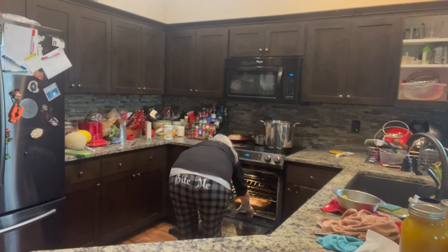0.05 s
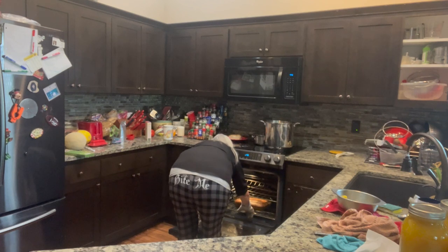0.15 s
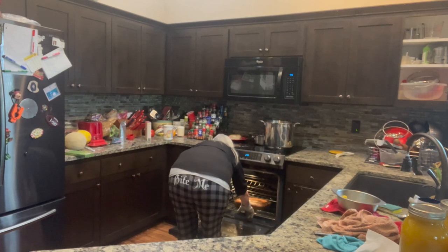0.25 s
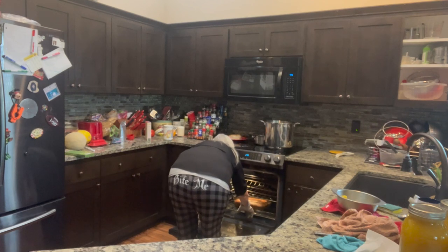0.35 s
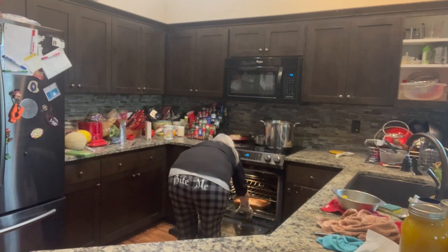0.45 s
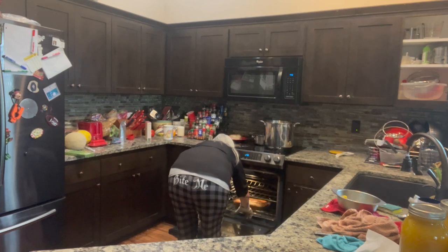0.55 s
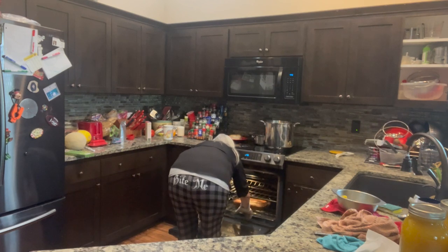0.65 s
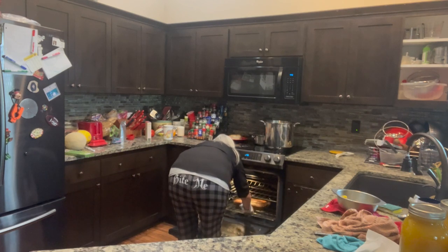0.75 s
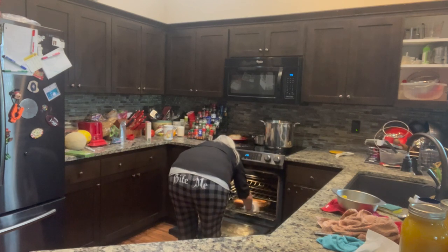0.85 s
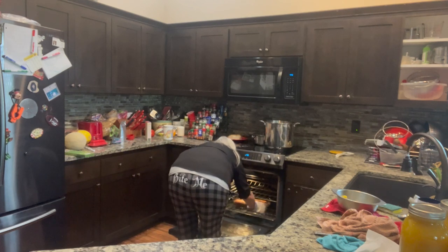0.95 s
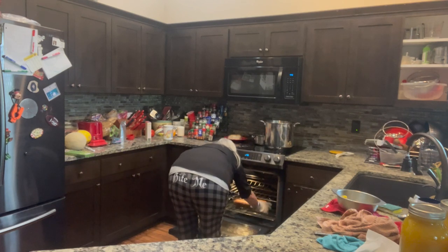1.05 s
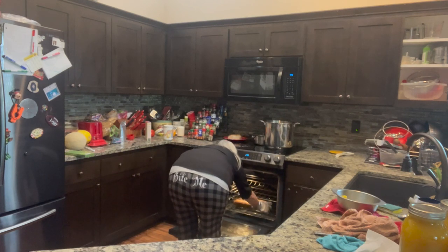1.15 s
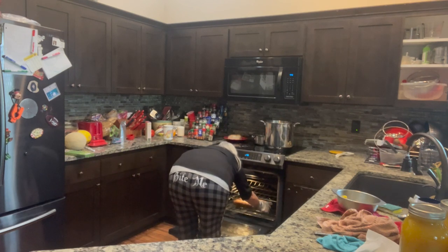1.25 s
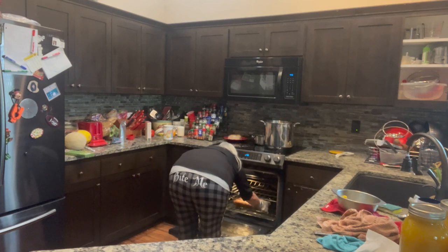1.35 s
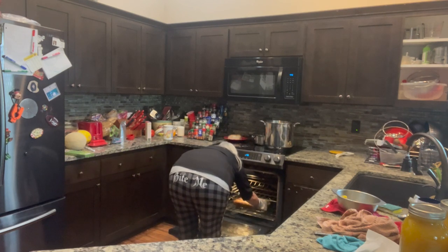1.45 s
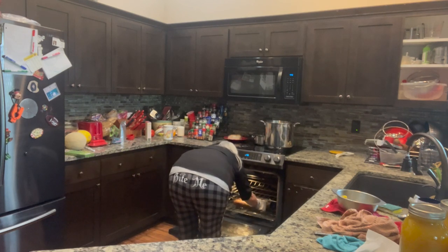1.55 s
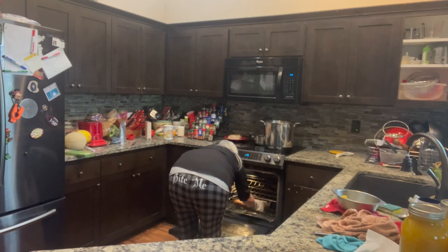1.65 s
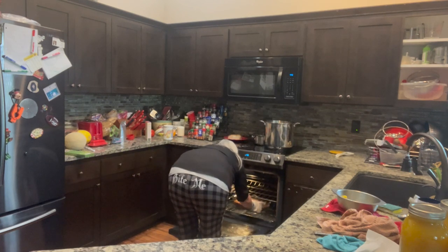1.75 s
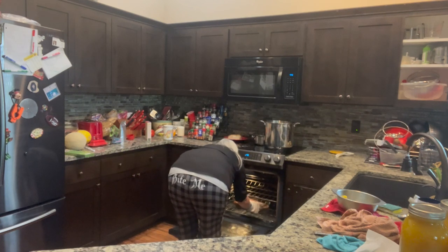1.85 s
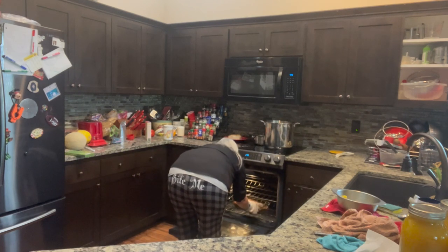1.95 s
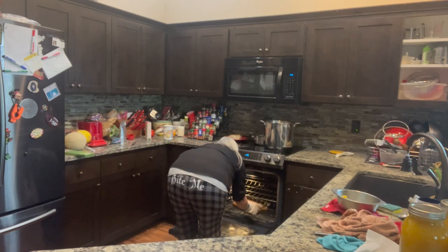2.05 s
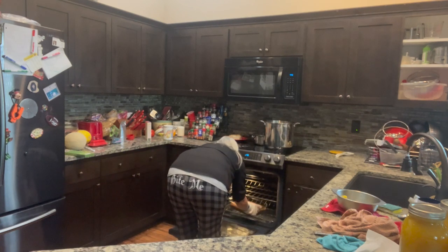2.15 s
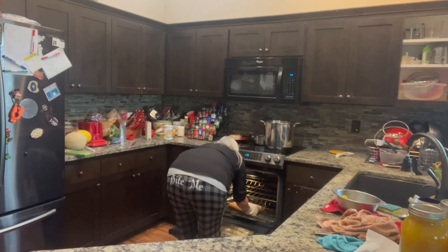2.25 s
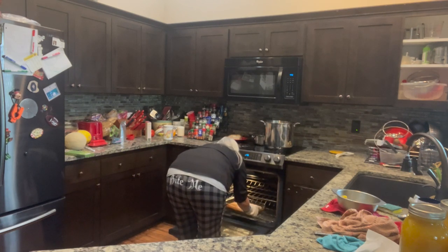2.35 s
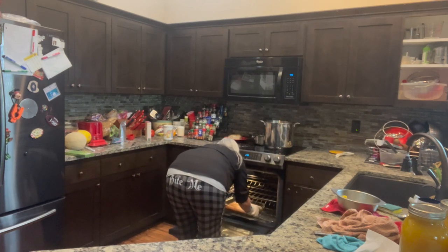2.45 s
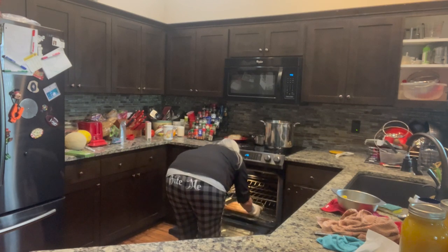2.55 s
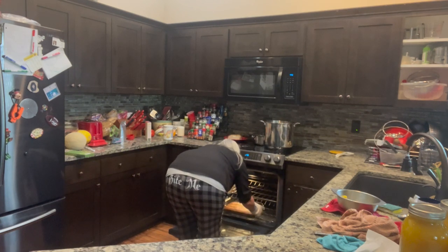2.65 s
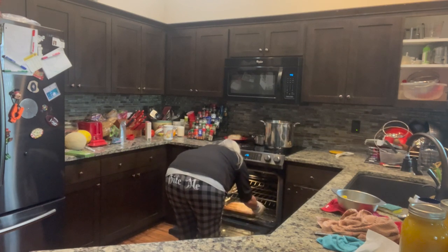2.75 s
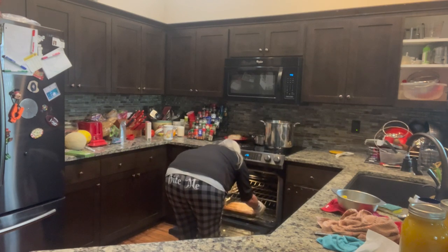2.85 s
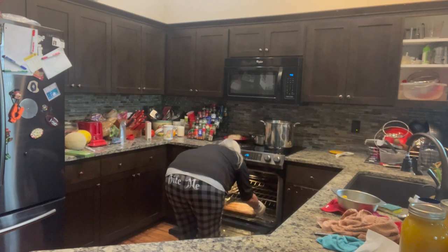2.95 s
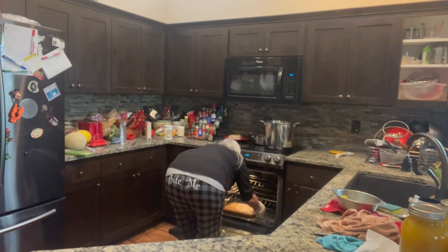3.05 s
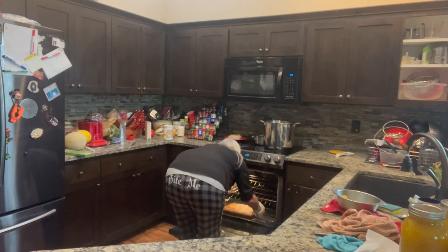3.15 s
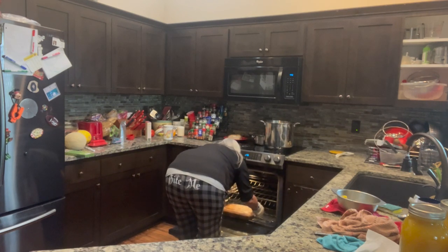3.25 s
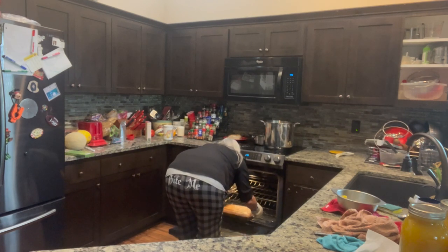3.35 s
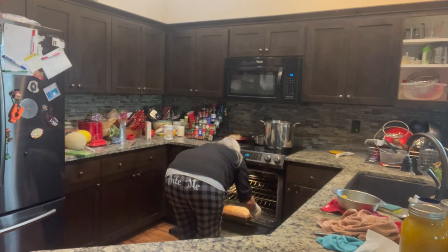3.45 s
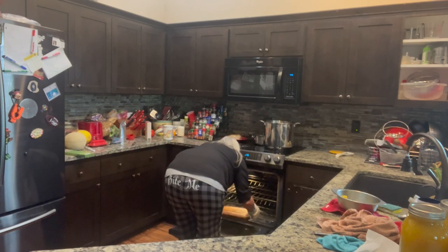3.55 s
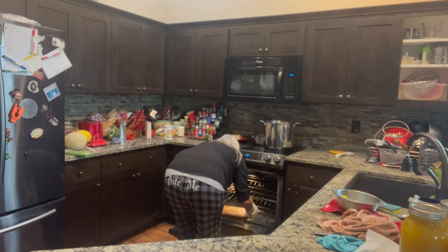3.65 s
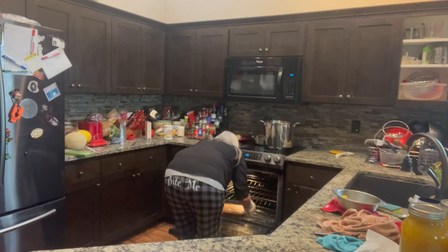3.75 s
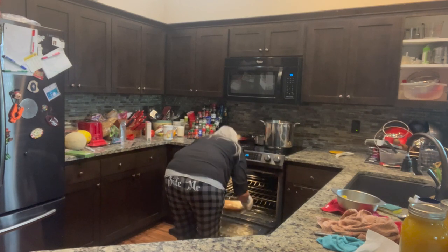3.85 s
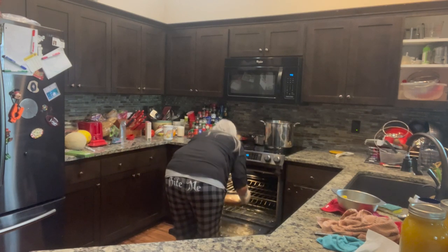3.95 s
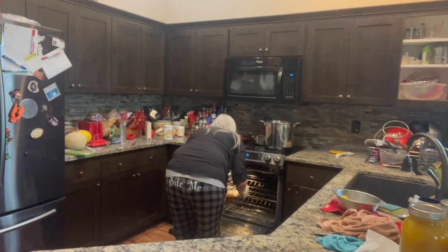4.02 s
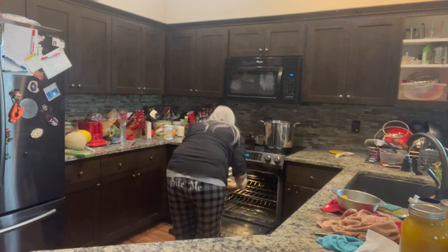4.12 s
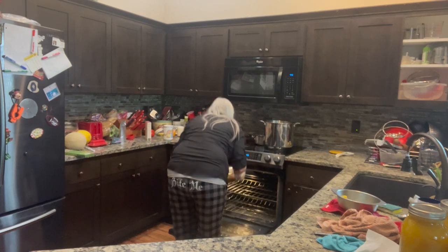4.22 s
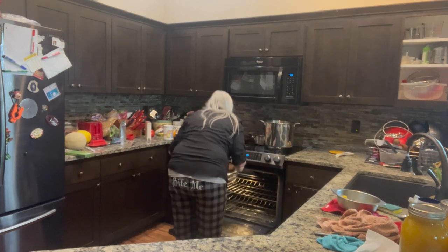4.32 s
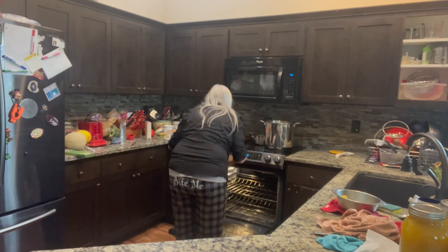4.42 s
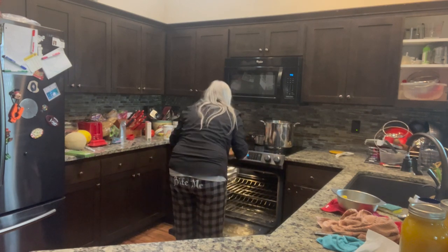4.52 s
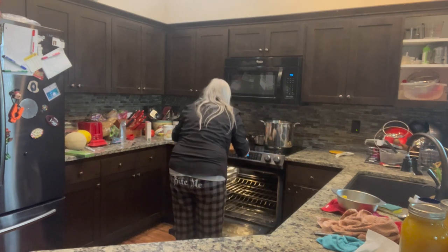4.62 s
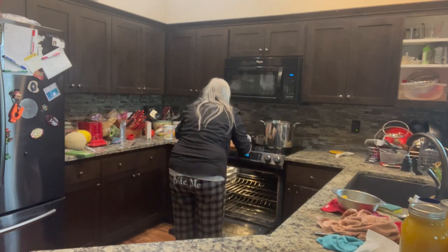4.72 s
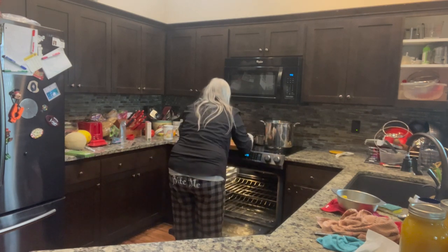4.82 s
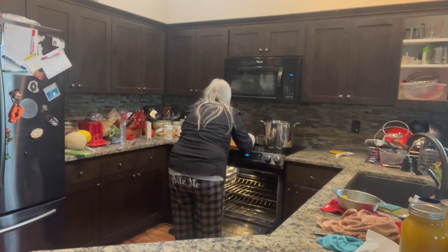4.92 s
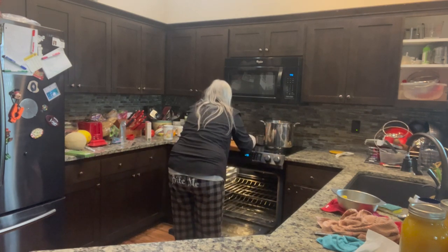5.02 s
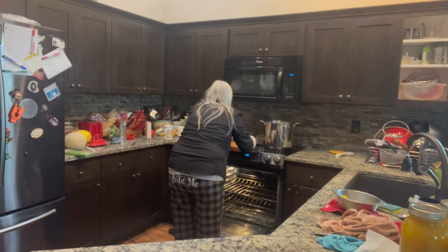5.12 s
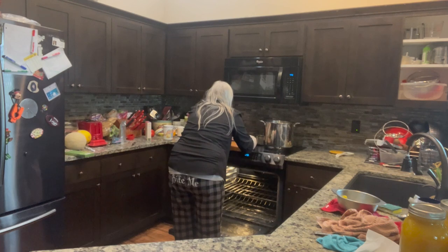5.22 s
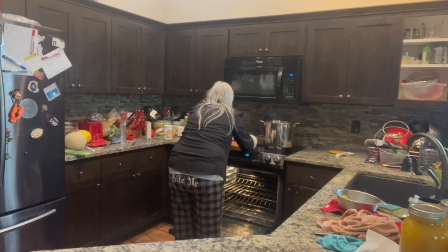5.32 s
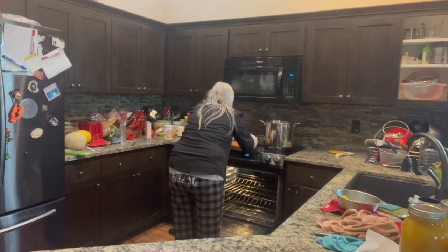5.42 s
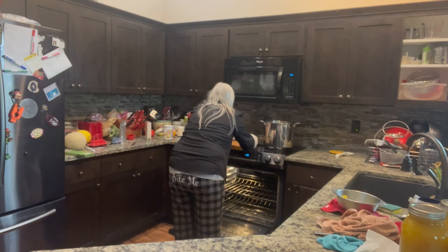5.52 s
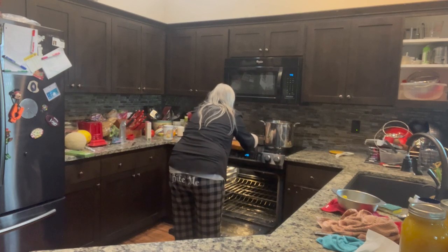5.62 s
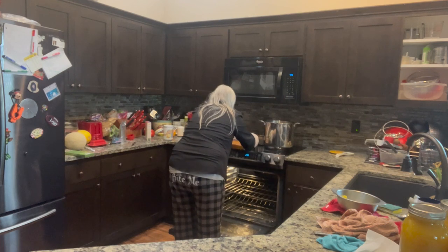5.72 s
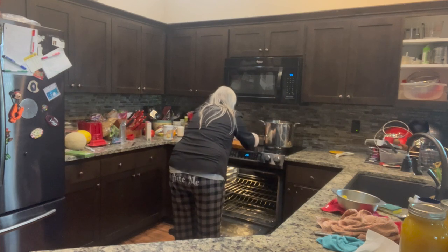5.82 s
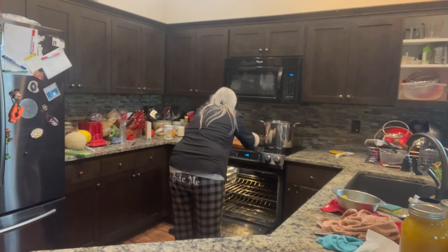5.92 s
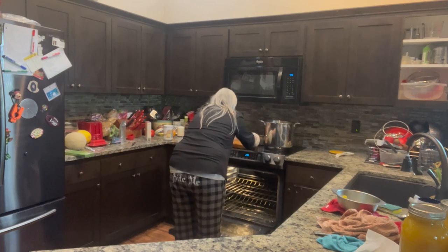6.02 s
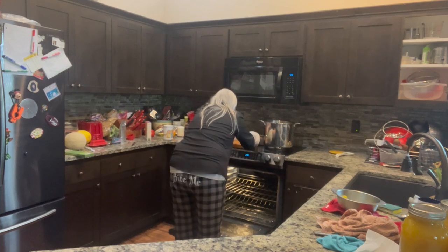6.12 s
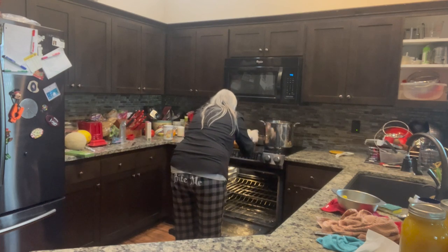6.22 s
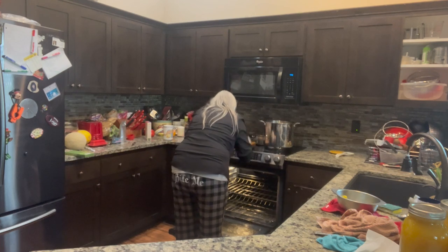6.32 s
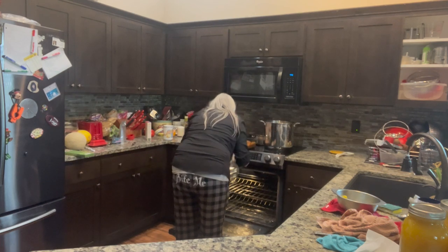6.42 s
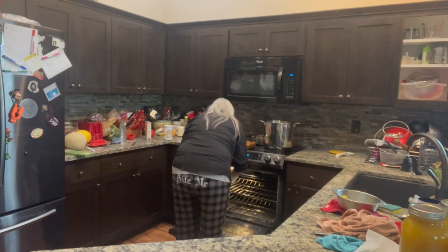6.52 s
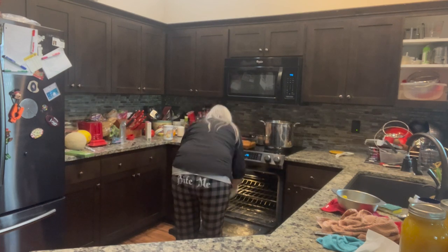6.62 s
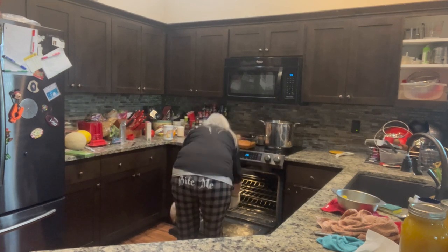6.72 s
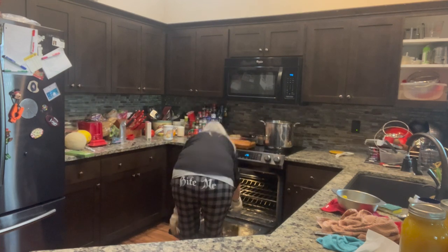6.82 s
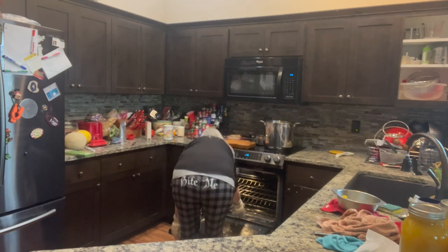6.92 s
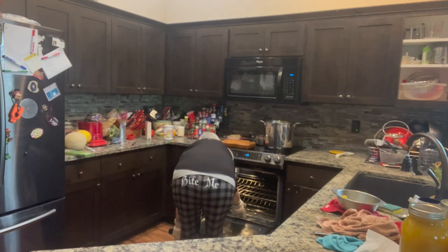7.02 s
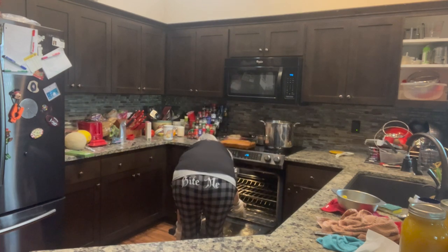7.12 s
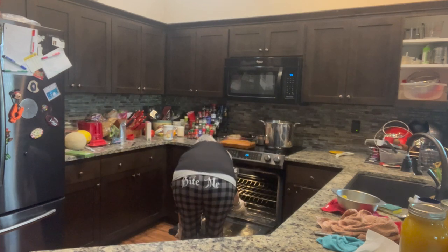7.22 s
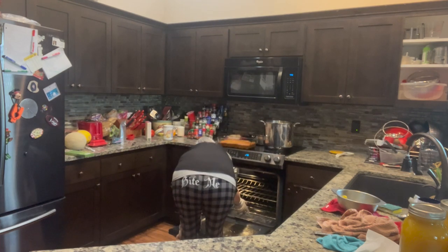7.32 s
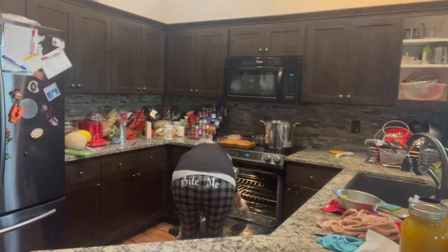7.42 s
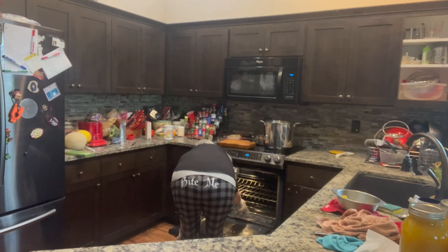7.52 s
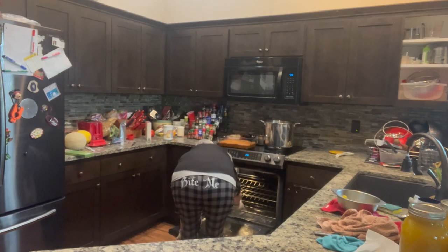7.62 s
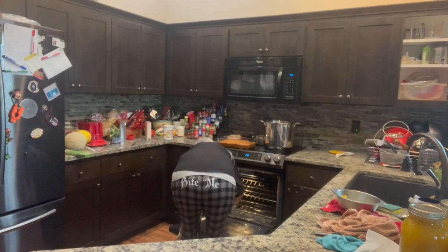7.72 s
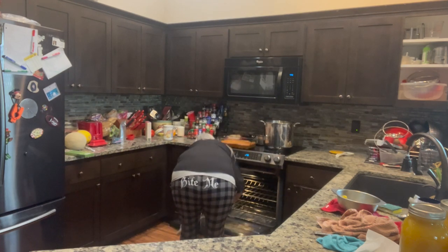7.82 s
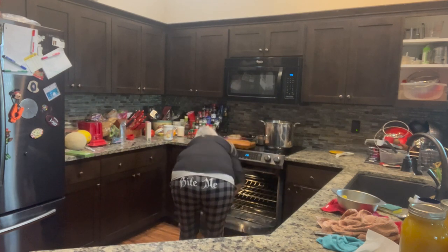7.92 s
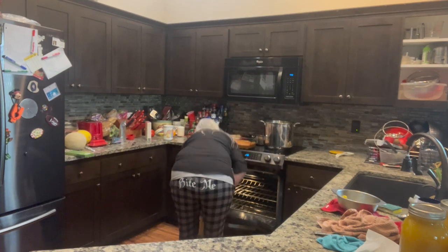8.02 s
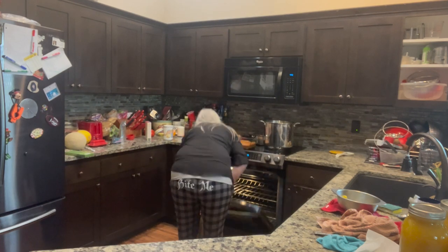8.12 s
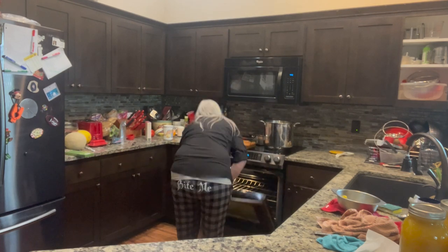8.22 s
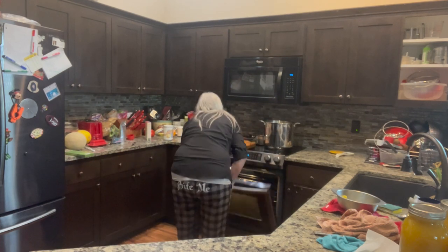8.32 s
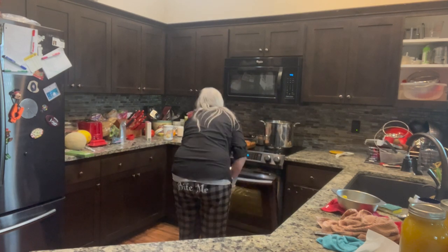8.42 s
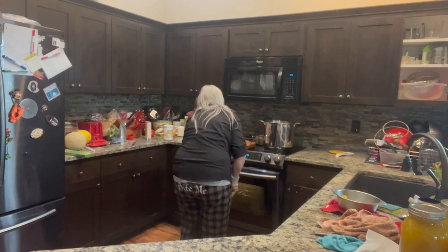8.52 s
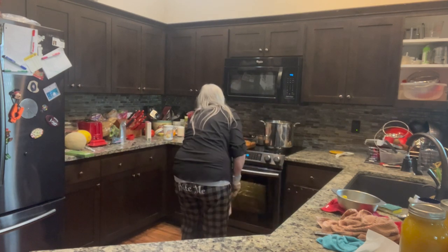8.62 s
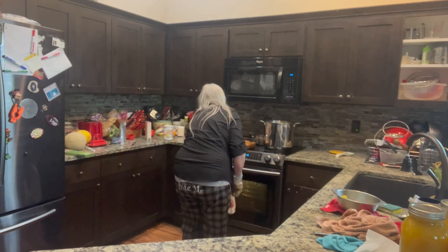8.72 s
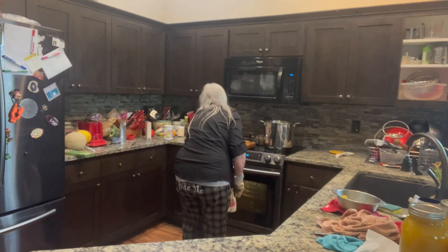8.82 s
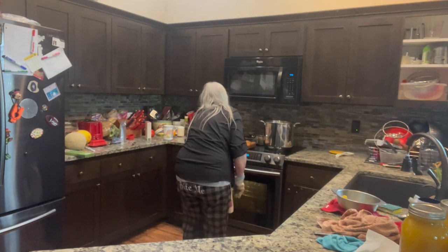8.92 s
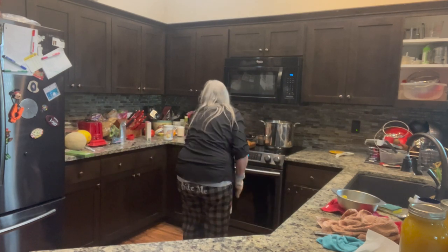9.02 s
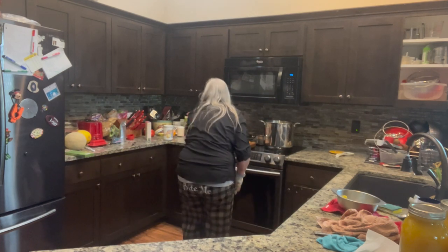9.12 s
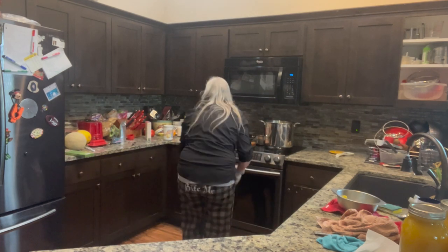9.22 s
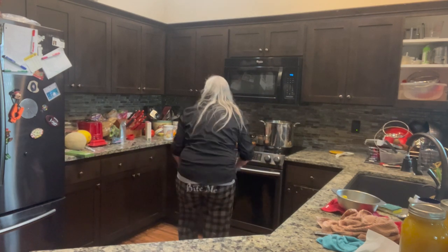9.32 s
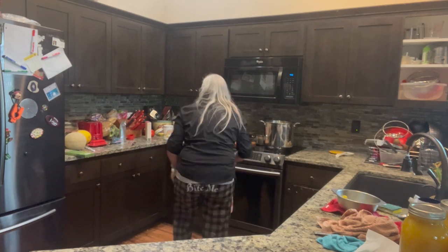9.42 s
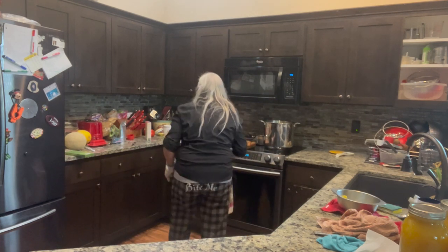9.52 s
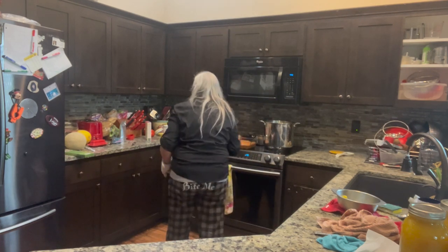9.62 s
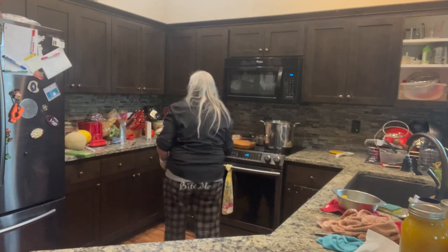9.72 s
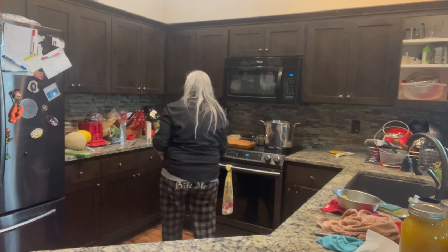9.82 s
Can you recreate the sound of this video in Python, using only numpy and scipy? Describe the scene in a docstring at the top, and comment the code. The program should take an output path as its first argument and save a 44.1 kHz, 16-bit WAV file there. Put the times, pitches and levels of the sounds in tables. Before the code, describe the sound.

Stereo pickup from across a reverberant kitchen: metal rattles as an oven rack is bumped, a baking pan gives one soft knock, and the rack squeaks along its rails. After a quiet pause the pan thumps down on the stove and shifts with small scrapes. Then the rack scrapes and slams in, ringing, the oven door creaks up with knocks, thumps shut and settles, over faint appliance rumble and hiss.

```python
"""A home kitchen in stereo: appliances rumble and a thin hiss runs throughout.
A wire oven rack is knocked and slid out, squeaking and humming; a baking pan is struck once; a faint treble
tick joins from 2.6 s; the pan lands on the stovetop and is nudged; the rack is shoved back with a clang; the
oven door is raised, shut and settles. Blows are noise bursts, ringing modes and a thud; scrapes and rustles
are grainy noise; squeaks and hums are unsteady sines. Hard walls answer with decaying noise."""
import sys
import numpy as np
from scipy import signal
from scipy.fft import rfft, irfft, next_fast_len
from scipy.io import wavfile
from scipy.ndimage import uniform_filter1d, map_coordinates

SR = 44100
rng = np.random.default_rng(int(sys.argv[2]) if len(sys.argv) > 2 else 0)


def wav_record(signal):
    """Record a signal, one row per channel, as 16-bit PCM in the file named by sys.argv[1]."""
    frames = np.transpose(np.atleast_2d(signal))
    bounded = np.clip(frames, -1, 1)
    # unit amplitude maps onto the largest positive 16-bit level
    quanta = np.round(bounded * 32767).astype(np.int16)
    wavfile.write(sys.argv[1], SR, quanta)


N = 434826
TIME = np.arange(N) / SR

# room tone before the stereo stage: (t/s, rumble level/dB, hiss level/dB)
TONE_LEVEL = [(0, -60, -90), (2.5, -63.5, -85), (4.3, -62.5, -83.5), (6.3, -63, -84.5), (6.5, -63, -78),
              (6.85, -62.5, -76.5), (7, -60.5, -80), (8.3, -57.5, -81), (9.86, -60, -81.5)]
# ringing modes of the stovetop: (f/Hz, relative level/dB, t60/s)
STOVE_MODES = [(366, 3, 0.079), (565, -3, 0.12), (1490, -26, .1), (2900, -12.5, 0.077), (3150, -13, 0.07)]
# ringing modes of the oven door: (f/Hz, relative level/dB, t60/s)
DOOR_MODES = [(121, 6, 0.12), (161.5, 4.5, 0.14), (347, 1, 0.13), (518, -17, 0.17), (810, -22, 0.62),
              (1556, -10, 0.16), (2270, -15, 0.24), (3260, -5, 0.076)]
# shares of a sound in the two fields (first, second): all in the first
CENTRE = np.array([[1], [0]])


def amp(db):
    """Decibels to amplitude."""
    return 10 ** (np.asarray(db) / 20)


def unit(x):
    """Scale to an rms of one."""
    return x / np.sqrt(np.mean(x ** 2) + 1e-20)


def along(points, hz):
    """Read a curve of (f/Hz, value) points on a log frequency axis."""
    f, v = np.transpose(points)
    return np.interp(np.log(hz + 1), np.log(f + 1), v)


def fade(n, rise=.022, fall=0.022):
    """Straight ends for a stretch of n samples; rise and fall in s."""
    k = np.arange(n) / SR
    return np.clip(np.minimum(k / rise, (n / SR - k) / fall), 0, 1)


def stretch(s, length):
    """The sample range of an event and the seconds since its start."""
    span = slice(round(s * SR), round((s + length) * SR))
    return span, TIME[span] - s


def wobble(rate):
    """A smooth random curve, rate knots a second."""
    coarse = TIME[::16]
    knots = rng.standard_normal(int(N * rate / SR) + 4)
    return np.interp(TIME, coarse, map_coordinates(knots, [coarse * rate]))


def filtered(x, response):
    """x shaped by a response of frequency."""
    m = next_fast_len(N + SR // 2)
    return irfft(rfft(x, m) * response(np.fft.rfftfreq(m, 1 / SR)), m)[..., :N]


def banded(envelopes, centres_hz):
    """Dense coloured noise under one envelope for each register, low to high."""
    # overall colour of the noise: (f/Hz, relative level/dB per Hz)
    noise_colour = [(30, -27.5), (60, 3.5), (130, 2.5), (300, -6), (600, -4), (1200, -6.5), (1750, -9.5),
                    (2100, -11.5), (2700, -12), (3300, -12), (5000, -15), (8000, -16.5), (11000, -19.5),
                    (13000, -32), (14200, -29.5), (15700, -37)]
    m = next_fast_len(N + SR // 2)
    hz = np.fft.rfftfreq(m, 1 / SR)
    colour = amp(along(noise_colour, hz))
    spectrum = 0
    for envelope, band in zip(envelopes, np.eye(len(centres_hz))):
        # neighbouring registers cross over evenly in power
        shape = np.sqrt(along(list(zip(centres_hz, band)), hz)) * colour
        noise = envelope * rng.standard_normal((2, N))
        spectrum = spectrum + rfft(noise, m) * unit(shape)
    return irfft(spectrum, m)[:, :N]


def patchy(x, patchy_db):
    """Brief patches of pitch rise and fall in level."""
    z = signal.stft(x, nperseg=1024)[2]
    field = uniform_filter1d(rng.standard_normal(z.shape[1:]), size=3, axis=0)
    field = uniform_filter1d(field, size=5, axis=1)
    gain = amp(patchy_db * unit(field))
    return signal.istft(z * unit(gain), nperseg=1024)[1][:, :N]


def kitchen(x):
    """The walls answer with noise in which each frequency dies at its own speed."""
    # decay of the place: (f/Hz, t60/s)
    wall_t60 = [(60, 0.76), (250, 0.55), (1000, 0.52), (4000, 0.57), (10000, 0.44)]
    hz, t, z = signal.stft(rng.standard_normal((2, SR)), SR, nperseg=256)
    t60 = along(wall_t60, hz)[:, None]
    tail = signal.istft(z * amp(-60 * t / t60), SR, nperseg=256)[1]
    delayed = np.pad(x, ((0, 0), (100, 0)))  # the answer starts 100 samples late
    return signal.fftconvolve(delayed, tail / np.linalg.norm(tail[0]), axes=1)[:, :N]


def scattered(x, count=4, slice_s=.006):
    """Echoes without steady pitch: successive short slices take turns among several decaying noise tails."""
    turn = TIME / slice_s
    out = 0
    for k in range(count):
        share = np.clip(1 - np.abs((turn - k) % count - 1), 0, 1)
        out = out + kitchen(x * np.sqrt(share))
    return out


def stereo(pair):
    """Two fields become mid and side by left-right correlation; the top treble is in opposite phase."""
    # correlation: (f/Hz, left-right correlation [-1..1]); below 0 the sides oppose in phase
    correlation = [(60, .97), (160, .95), (300, .7), (600, .5), (1700, .3), (3000, -.1), (5500, -.25),
                   (6800, -.6), (7900, -.98), (8700, -.75), (9900, .25), (10800, .93), (11300, .999),
                   (13000, .999), (13900, -.99)]
    # lean of the image: (f/Hz, left against right/dB)
    lean = [(40, -1.8), (150, -.8), (300, -2.5), (1000, -1.3), (2500, -2), (5000, -6), (7500, -1),
            (10000, 0)]
    m = next_fast_len(N + SR // 2)
    hz = np.fft.rfftfreq(m, 1 / SR)
    turn = np.arccos(np.clip(along(correlation, hz), -1, 1)) / 2
    mid, side = rfft(pair, m) * [np.cos(turn), np.sin(turn)]
    balance = amp(along(lean, hz) * np.array([[.5], [-.5]]))
    return irfft(np.array([mid + side, mid - side]) * balance, m)[:, :N]


def room_tone():
    """Appliance rumble that swells and sags, and a thin treble hiss: two shaped noises."""
    # colour of the rumble: (f/Hz, relative level/dB per Hz)
    rumble_colour = [(20, -24.5), (45, -5), (65, 5.5), (95, 1.5), (140, -9), (250, -8.5), (450, -18),
                     (1000, -29.5), (2500, -37), (7000, -35.5), (15500, -52.5)]
    # colour of the hiss: (f/Hz, relative level/dB per Hz)
    hiss_colour = [(5000, -24.5), (8800, -6), (10300, 7.5), (12000, -18.5), (15500, -26.5)]
    s, *levels = np.transpose(TONE_LEVEL)
    out = 0
    for colour, db in zip([rumble_colour, hiss_colour], levels):
        noise = unit(filtered(rng.standard_normal((2, N)), lambda f: amp(along(colour, f))))
        out = out + amp(np.interp(TIME, s, db) + 0.35 * wobble(2.8)) * noise
    return out


def ticks():
    """A faint treble tick every 40 ms; more fall in between, the more the hiss swells."""
    period_s, first_s = .0400412, 2.6104
    at = np.arange(first_s, N / SR, period_s / 4)
    chance, level = rng.standard_normal((2, len(at)))
    s, _, hiss_db = np.transpose(TONE_LEVEL)
    threshold = np.interp(np.interp(at, s, hiss_db), [-83, -77], [1.5, .1])
    regular = np.arange(len(at)) % 4 == 0
    train = np.zeros(N)
    train[(at * SR).astype(int)] = (regular | (chance > threshold)) * amp(-47 + 5 * regular + 2 * level)
    return filtered(train, lambda f: np.exp(-((f - 10300) / 2200) ** 2))


def sway():
    """The whole rack hums at its lowest bending: sines of unsteady pitch and level."""
    # hums: (t/s, length/s, mean f/Hz, level/dB at the start, fall/dB per s)
    hums = [(1.9, 1.4, 136.6, -61.5, 2.5), (3.39, 0.95, 135, -58.5, 19.5), (7.052, 0.14, 118.3, -48, -6),
            (7.299, 1.3, 120.7, -40, 31.5)]
    out = np.zeros(N)
    unsteady = amp(2 * wobble(14))
    drift = 1 + 0.018 * wobble(3.5)
    for s, length, hz, db, fall_db in hums:
        span, t = stretch(s, length)
        phase = 2 * np.pi * np.cumsum(hz * drift[span]) / SR
        out[span] += np.sqrt(2) * amp(db - fall_db * t) * fade(len(t)) * np.sin(phase)
    return out * unsteady


def squeaks():
    """A wire catches on the rails and sings briefly: a swelling and fading sine of shaky pitch."""
    # squeaks of the rack: (t/s, mean f/Hz, level/dB before the flutter, length/s)
    songs = [(1.55, 3250, -66, .09), (1.58, 2250, -68, .08), (1.93, 1650, -65, .07), (2.11, 4900, -59, .1),
             (2.12, 5750, -60, .05), (2.15, 550, -62, .07), (2.16, 2250, -61, .1), (2.19, 790, -58, .1),
             (2.23, 1270, -57, .08), (2.24, 4800, -63, .12), (2.295, 2930, -55, .05),
             (2.37, 2900, -63, .05), (2.37, 2230, -61, .09), (2.385, 1180, -58, .07),
             (2.45, 1850, -66, .06), (3.05, 1180, -64, .07), (3.195, 2904, -55, .045),
             (3.22, 7000, -60, .033), (3.262, 1720, -57, .03)]
    out = np.zeros((2, N))
    shake = np.array([wobble(60), wobble(41)])
    for s, hz, db, length in songs:
        span, t = stretch(s, length)
        phase = 2 * np.pi * np.cumsum(hz * (1 + 0.03 * shake[:, span]), axis=1) / SR
        out[:, span] += amp(db) * np.hanning(len(t)) * np.sin(phase)
    return out * unit(amp(2.7 * wobble(70)))


def slides():
    """Scrapes, rubs and faint rustles: clumped grains; each stroke builds, swells or fades, and stops short."""
    # strokes: (t/s, length/s, start level/dB, swell to the end/dB, rumble against scrape/dB, brightness/dB)
    strokes = [(0.309, 0.074, -72.5, 16.5, 2.5, 2), (1.034, 0.26, -115, -2, 14.5, -6),
               (1.47, 0.29, -66, 11.5, 0, -1), (1.788, 0.42, -62.5, -4, 7.5, 4.5),
               (2.103, 0.49, -54, -9.5, 1, 1), (2.91, 0.465, -74, 10.5, 1, 5.5),
               (4.802, 0.087, -78.5, 3.5, -2, -2), (6.298, 0.4, -86, -6, -8, 7.5),
               (5.268, 0.28, -61.5, 2.5, 5.5, -1), (5.452, 0.29, -66.5, 7, 3, 0.5),
               (5.72, 0.3, -51, -14, 1, -1.5), (7.025, 0.3126, -60, 21.5, 3.5, -1),
               (8.1, 0.12, -77, -2, -12, 7), (8.404, 0.3, -48, -33, 13, -1),
               (8.954, 0.35, -56.5, -17, 7, -7.5), (9.28, 0.14, -76, -16, 21.5, 13.5)]
    # resonances under a stroke: (f/Hz, width/Hz, lift/dB)
    resonances = [(815, 130, 1.5), (1239, 110, 2.5), (2250, 170, 4), (2960, 200, 2), (4900, 400, 1.5)]
    # centres of the registers rumble, scrape, edge, air: (f/Hz)
    centres_hz = [120, 900, 4200, 11000]
    edge_db, air_db = -3, -7.5  # against the scrape
    air_lift = 1.5  # dB of air for each dB of brightness
    rise_share, fall_s = 0.22, 0.016  # share of the stroke's length; s
    levels = np.zeros((4, N))
    for s, length, db, swell_db, rumble_db, bright_db in strokes:
        span, t = stretch(s, length)
        registers_db = np.array([rumble_db, 0, edge_db + bright_db, air_db + air_lift * bright_db])
        level_db = db + swell_db * t / length + registers_db[:, None]
        levels[:, span] += amp(level_db) * fade(len(t), rise_share * length, fall_s) ** 2
    grains = unit(amp(2.8 * wobble(30) + 1.5 * wobble(250)))

    def lift(f):
        return amp(sum(db / (1 + (2 * (f - hz) / width) ** 2) for hz, width, db in resonances))

    return patchy(filtered(banded(levels * grains, centres_hz), lift), patchy_db=3)


def mode_waves(modes, t, waver):
    """Dying complex waves of an object's modes, each doubled: like wires ring in loose, wavering pairs."""
    hz, mode_db, t60 = np.repeat(modes, repeats=2, axis=0).T[:, :, None]
    knots = rng.standard_normal((len(hz), 64))
    drift = np.array([np.interp(t * 40, np.arange(64), row) for row in knots])
    steadiness = 1 + .4 * t60  # long modes waver less
    phase = 2 * np.pi * np.cumsum(hz * (1 + waver * drift / steadiness), axis=1) / SR
    decay = amp(mode_db - 3.0 - 60 * t / t60) * (1 - np.exp(-t / 0.00472))
    return hz.T, t60.T, decay * np.exp(1j * phase)


def blows(table, body, modes, length, waver, swell_cycles):
    """Each blow pushes the panel, adds a dying burst to the registers and rings the modes at new strengths."""
    # gain of bite, edge and air: (dB for each dB of hardness)
    hard_lifts = (0.16, 0.41, 1.388)
    # rise of bass, clank, bite, edge and air: (share of the contact rise)
    rise_shares = [
        [1.8],
        [1.44],
        [0.29],
        [0.58],
        [1],
    ]
    rattle_db, low_rattle_db = -5, -6  # burst against the clank level; its bass against the thud, besides
    contact_rise_s = 0.0055
    crack_db, crack_s = 5.5, 0.011  # first touch in the bite: height over the burst, t60
    held_db = 1.2  # long modes lose this for each dB of extra bite and kHz: a biting blow rests on the wires
    bursts = np.zeros((5, N + length))
    ring, thud = np.zeros((2, 2, N + length))
    t = np.arange(length) / SR
    thud_hz, *treble_db = body
    hz, t60, waves = mode_waves(modes, t, waver)
    cycles = thud_hz * t  # the panel swells and dies within some cycles
    swell = cycles / swell_cycles
    push = swell * np.exp((1 - swell ** 2) / 2) * np.sin(2 * np.pi * cycles)
    slower = np.array([[1.6], [1.1], [1], [.9], [.8]])  # bass lingers, treble dies first
    onset = 1 - np.exp(-t / (contact_rise_s * np.array(rise_shares)))
    crack = 1 + amp(crack_db - 60 * t / crack_s)
    short = t60 < .6
    for s, db, thud_db, hard_db, ring_db, favoured_hz, contact_s, bite_db in table:
        at = slice(round(s * SR), round(s * SR) + length)
        decay = amp(-60 * t / (contact_s * slower)) * onset
        decay[2] *= crack
        upper_db = np.array(treble_db) + hard_db * np.array(hard_lifts) + [bite_db, 0, 0]
        registers_db = np.r_[thud_db + low_rattle_db, 0, upper_db]
        bursts[:, at] += amp(db + rattle_db + registers_db[:, None]) * decay

        # the place of the blow favours some short modes
        near = 1 + 1.6 * short * np.exp(-(np.log(hz / favoured_hz) / 0.15) ** 2)
        held = held_db * max(bite_db, 0) * ~short * hz / 1e3
        size = (2, hz.size)
        strength = near * amp(rng.normal(0, 0.86, size) - held) * np.exp(2j * np.pi * rng.random(size))
        ring[:, at] += amp(db + ring_db) * (strength @ waves).imag
        thud[:, at] += CENTRE * amp(db + thud_db) * push
    return bursts[:, :N], ring[:, :N], thud[:, :N]


def hinge():
    """The oven door is raised: its panel and modes answer the hinge knocks."""
    # (t/s, clank/dB, then against it thud/dB, hardness/dB, ring/dB; favoured f/Hz, bite t60/s, extra bite/dB)
    hinge_knocks = [(8.361, -38.5, -13, 2.5, -14, 350, 0.065, -0.5),
                    (8.373, -37.5, -11, -0.5, -9, 350, 0.064, 0.5),
                    (8.453, -35.5, -19, 9.5, -9.5, 350, 0.045, -5),
                    (8.474, -31, -18, -11, -10, 1500, 0.036, 2.5)]
    # at ordinary hardness: (thud f/Hz, bite/dB, edge/dB, air/dB), levels against the clank
    body = (141, -7, -9, -8)
    return blows(hinge_knocks, body, DOOR_MODES, SR // 2, waver=.05, swell_cycles=3.2)


def door():
    """The oven door shuts and settles: a low panel thud with ringing modes."""
    # (t/s, clank/dB, then against it thud/dB, hardness/dB, ring/dB; favoured f/Hz, bite t60/s, extra bite/dB)
    door_blows = [(8.698, -41, 7, 32, -18, 2270, 0.057, 0.5), (8.722, -31, 6, -5.5, -1.5, 119, 0.17, 1.5),
                  (8.737, -37.5, -15, 10, -0.5, 1556, 0.059, 0.5),
                  (8.805, -32.5, -1, -0.5, -4, 3100, 0.088, 3),
                  (9.552, -49.5, 9.5, 13.5, -23, 491, 0.085, -9)]
    # at ordinary hardness: (thud f/Hz, bite/dB, edge/dB, air/dB), levels against the clank
    body = (58.5, -7.5, -4.5, -23.5)
    return blows(door_blows, body, DOOR_MODES, SR // 2, waver=.06, swell_cycles=3.2)


def rim():
    """The pan's rim catches the stovetop, which rings in its short modes."""
    # (t/s, clank/dB, then against it thud/dB, hardness/dB, ring/dB; favoured f/Hz, bite t60/s, extra bite/dB)
    rim_ticks = [(5.687, -43, -10, 5.5, -12, 565, 0.03, -0.5), (5.696, -44, -11, 2, -25, 565, 0.05, -5),
                 (5.768, -54.5, -13, 10.5, -17, 565, 0.037, 6)]
    # at ordinary hardness: (thud f/Hz, bite/dB, edge/dB, air/dB), levels against the clank
    body = (146, 3.5, -26, 5)
    return blows(rim_ticks, body, STOVE_MODES, SR // 2, waver=.05, swell_cycles=2.4)


def pan():
    """One blow on the baking pan rings its modes."""
    # (t/s, clank/dB, then against it thud/dB, hardness/dB, ring/dB; favoured f/Hz, bite t60/s, extra bite/dB)
    pan_blows = [(1.326, -53, -0.5, -17, -4.5, 930, 0.39, -0.5)]
    # at ordinary hardness: (thud f/Hz, bite/dB, edge/dB, air/dB), levels against the clank
    body = (119, -10, -16, -40)
    # ringing modes: (f/Hz, relative level/dB, t60/s)
    modes = [(487, 4, 0.32), (930, 4.5, 0.19), (1245, 4, 0.11), (2450, -7.5, 0.16), (2830, -7, 0.29),
             (5100, -4, 0.06)]
    return blows(pan_blows, body, modes, SR // 2, waver=.02, swell_cycles=2.6)


def stovetop():
    """The pan lands on the stovetop and is nudged: dull blows with short modes."""
    # (t/s, clank/dB, then against it thud/dB, hardness/dB, ring/dB; favoured f/Hz, bite t60/s, extra bite/dB)
    stove_blows = [(5.094, -18.5, -14.5, 7, -9, 366, 0.042, -1.5),
                   (5.106, -17.5, -0.5, 5, -13.5, 565, 0.042, 2.5),
                   (5.147, -31, 2.5, 9, -35, 323, 0.062, -3), (5.455, -38, 0.5, -13, -9, 340, 0.11, -0.5),
                   (5.495, -51.5, 7.5, -16, -9, 340, 0.033, -9), (5.518, -45, -2, -12, -11, 340, 0.062, -1),
                   (5.842, -42.5, -4, 0, -8, 565, 0.08, 8), (5.87, -46, 6, -12, -10, 565, 0.1, 4),
                   (5.905, -40.5, -2.5, -31, -26, 462, 0.14, 1),
                   (6.181, -67.5, 21.5, -28, -28, 369, 0.11, -12)]
    # at ordinary hardness: (thud f/Hz, bite/dB, edge/dB, air/dB), levels against the clank
    body = (127, -13.5, -8.5, -34)
    return blows(stove_blows, body, STOVE_MODES, SR // 2, waver=.05, swell_cycles=2.4)


def rack():
    """The wire rack is knocked and shoved back: its wires ring in short and long modes."""
    # (t/s, clank/dB, then against it thud/dB, hardness/dB, ring/dB; favoured f/Hz, bite t60/s, extra bite/dB)
    rack_blows = [(0.0, -33, -10.5, 5.5, -25, 617, 0.05, -1.5),
                  (0.351, -40.5, -2, 7.5, -21, 906, 0.48, -4.5),
                  (0.384, -21.5, -5.5, -1, -10, 1025, 0.047, 6), (0.396, -28, -2.5, -21, -7, 1020, 0.14, 4),
                  (0.42, -35, -5, 5, -20, 945, 0.083, -2), (0.457, -35, 2, 10.5, -23, 945, 0.07, 0.5),
                  (0.478, -33.5, -2, -10, -6, 1070, 0.097, 6.5),
                  (0.536, -44.5, 10.5, 11, -27, 450, 0.12, 3), (0.63, -48, -1, 0, -3, 945, 0.079, 7),
                  (0.719, -47, 0, -44.5, -27.5, 676, 0.15, 4),
                  (1.718, -28.5, -14.5, -3, -15.5, 553, 0.11, 3), (2.111, -52, -11, 15, -6, 456, 0.17, -7),
                  (3.368, -34, -15.5, 0.5, -9, 1170, 0.061, 1.5),
                  (3.385, -34, -10, -11, -23, 1070, 0.084, -1), (3.425, -45, -5, -12, -7, 945, 0.065, 8),
                  (3.445, -39, -5, -10, -13, 1478, 0.12, 0.5),
                  (7.022, -45.5, -15.5, -18.5, -10.5, 560, 0.08, 6),
                  (7.082, -41, -1.5, -43, -8.5, 566, 0.1, -6.5),
                  (7.227, -31, -3.5, 8.5, -8, 546, 0.059, -7), (7.279, -26.5, -3.5, -29, -15, 545, 0.09, 5),
                  (7.336, -21.5, -4, 2, -22, 553, 0.11, -3.5),
                  (7.352, -13, -20, 0.5, -16.5, 508, 0.028, -0.5),
                  (7.379, -32.5, 2.5, -3, -7, 625, 0.096, -2)]
    # at ordinary hardness: (thud f/Hz, bite/dB, edge/dB, air/dB), levels against the clank
    body = (125.5, -6.5, -8, -14)
    # ringing modes: (f/Hz, relative level/dB, t60/s)
    modes = [(550, -0.5, 0.18), (653, -23, 2.0), (710, -23, 2.5), (945, 0.5, 0.11), (1070, -8, 0.15),
             (1265, -7, 0.28), (1360, -27.5, 1.3), (1478, -5.5, 0.22), (1702, -5, 0.22), (1760, -29.5, 1.4),
             (1842, -21.5, 1.6), (1986, -25.5, 1.6), (2255, -12.5, 0.47), (2810, -36.5, 0.49),
             (3220, -14.5, 0.3), (3670, -20, 0.9), (4400, -34, .2)]
    return blows(rack_blows, body, modes, 5 * SR // 4, waver=.034, swell_cycles=2.6)


def knocks():
    """All blows together; loose metal chatters: quick random swings of their noise."""
    # centres of a blow's registers bass, clank, bite, edge, air: (f/Hz)
    blow_hz = [120, 450, 1250, 3600, 11000]
    # the same for the duller stovetop, whose clank stops lower: (f/Hz)
    stove_hz = [120, 420, 900, 3300, 11000]
    bursts, rings, thuds = map(sum, zip(rack(), pan(), rim(), hinge(), door()))
    stove_bursts, stove_rings, stove_thuds = stovetop()
    chatter = unit(amp(2.6 * wobble(120)))
    noise = banded(bursts * chatter, blow_hz) + banded(stove_bursts * chatter, stove_hz)
    return noise, rings + stove_rings, thuds + stove_thuds


def scene():
    """All sources, direct and off the kitchen walls, in stereo."""
    bursts, rings, thuds = knocks()
    rub, song = slides(), squeaks()
    wet = amp(6.0) * scattered(bursts) + amp(-1.5) * scattered(rub)
    wet += amp(-5) * kitchen(rings) + amp(-4.5) * kitchen(song) + amp(-10.5) * kitchen(thuds)
    direct = amp(2.5) * bursts + amp(-2.5) * rub + song + rings + thuds + CENTRE * sway()
    return stereo(direct + wet + room_tone() + ticks())


def record(dry):
    """Nothing is kept above the band limit of 15.7 kHz."""
    return filtered(dry, lambda hz: hz < 15700)


dry = scene()
out = record(dry)
wav_record(out)
```